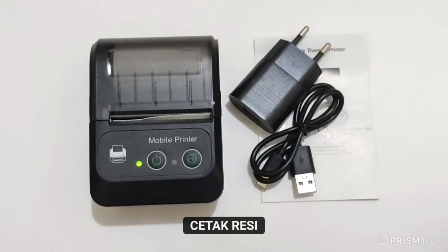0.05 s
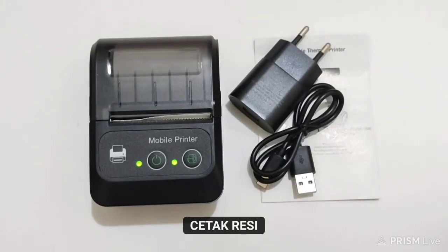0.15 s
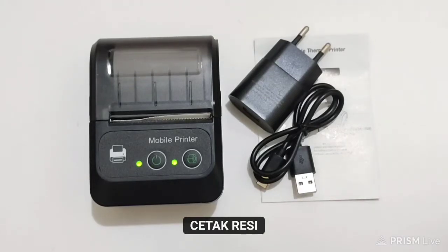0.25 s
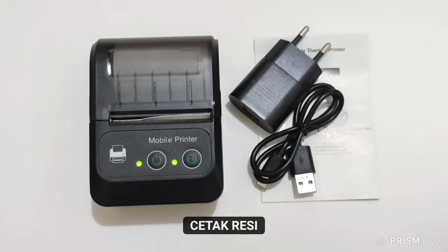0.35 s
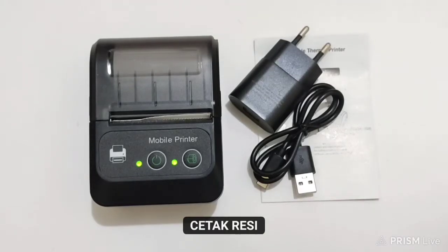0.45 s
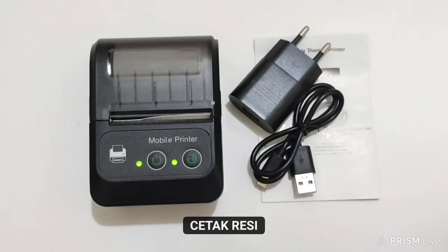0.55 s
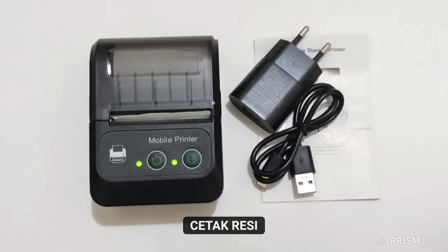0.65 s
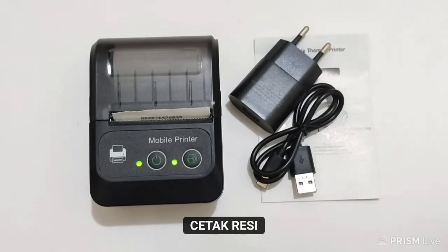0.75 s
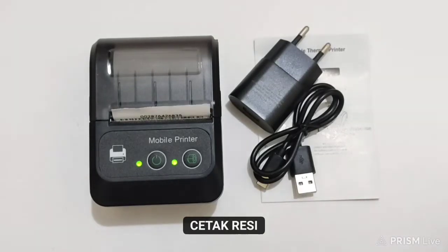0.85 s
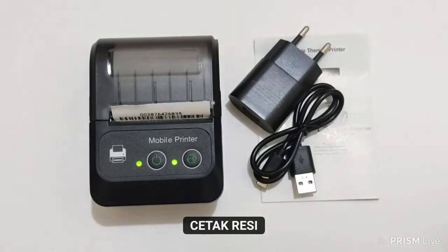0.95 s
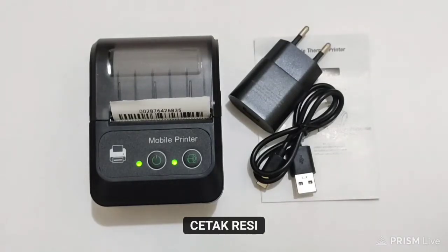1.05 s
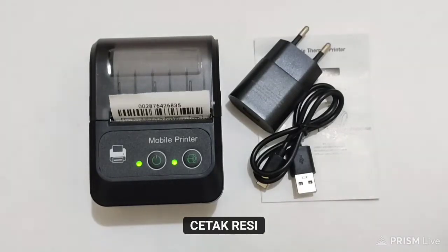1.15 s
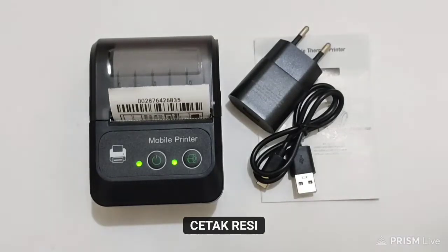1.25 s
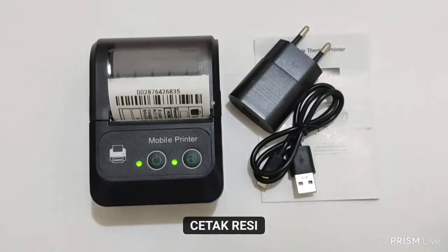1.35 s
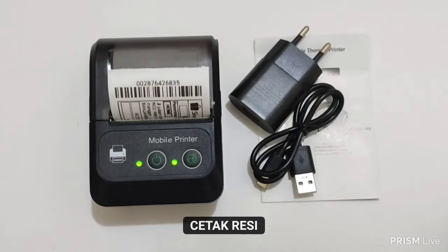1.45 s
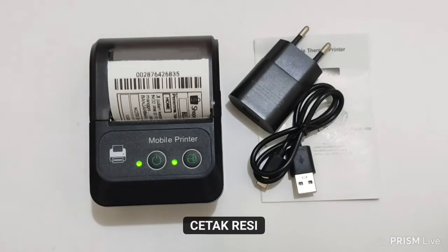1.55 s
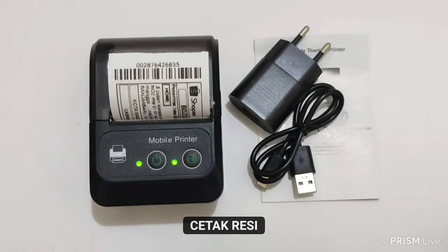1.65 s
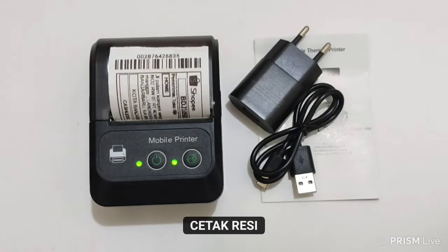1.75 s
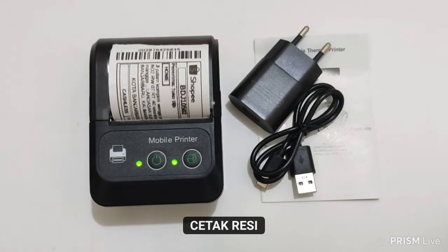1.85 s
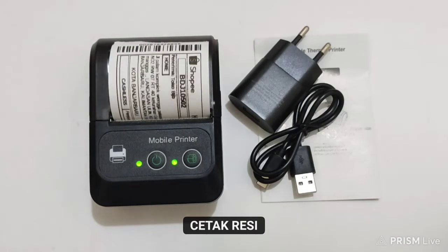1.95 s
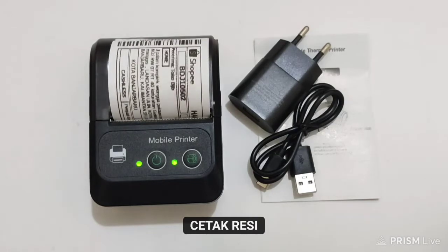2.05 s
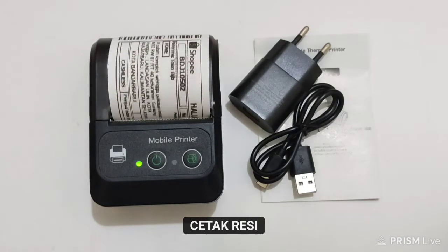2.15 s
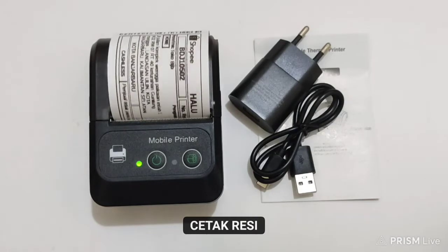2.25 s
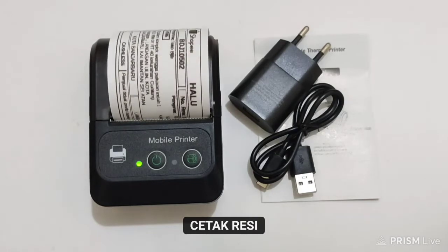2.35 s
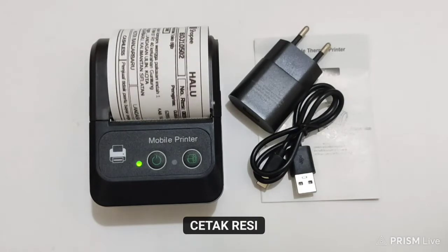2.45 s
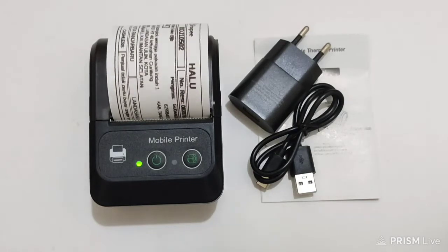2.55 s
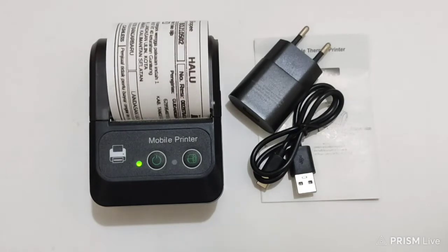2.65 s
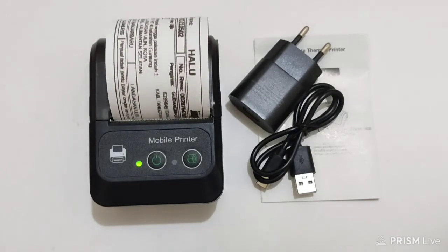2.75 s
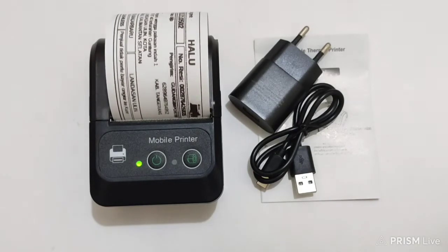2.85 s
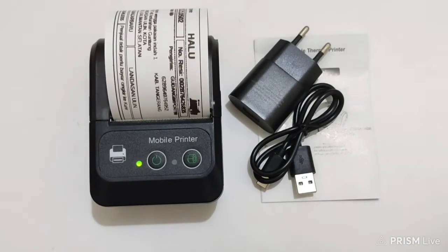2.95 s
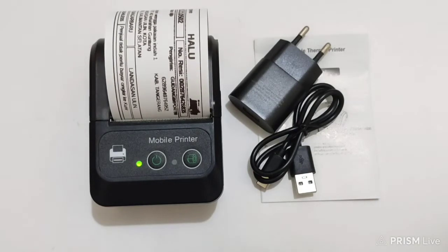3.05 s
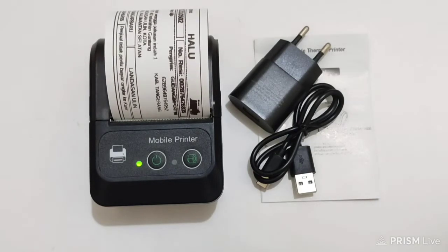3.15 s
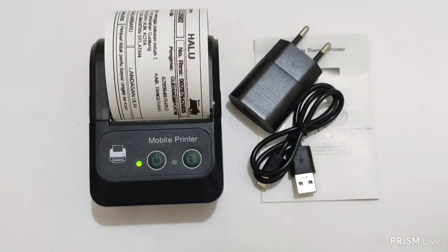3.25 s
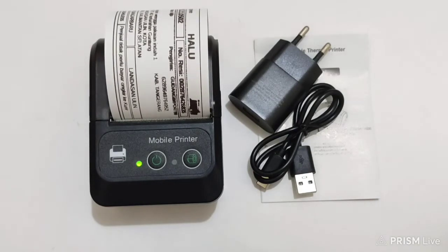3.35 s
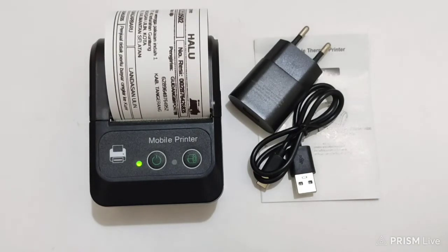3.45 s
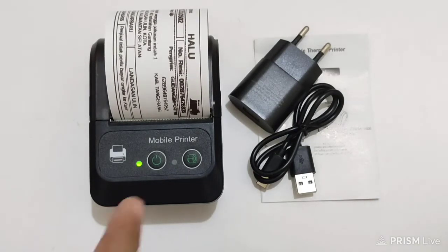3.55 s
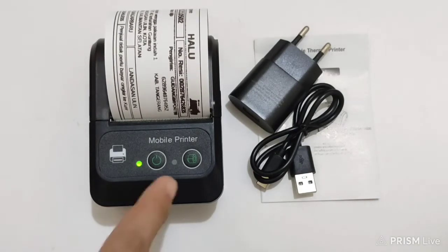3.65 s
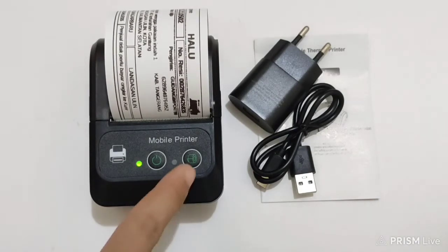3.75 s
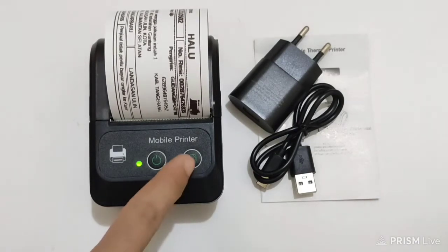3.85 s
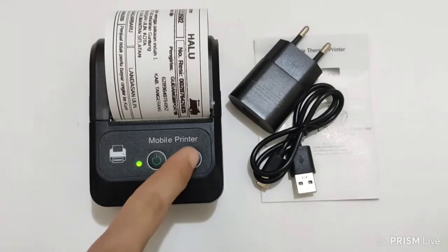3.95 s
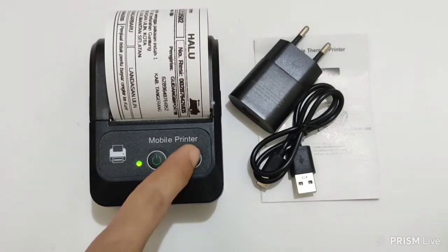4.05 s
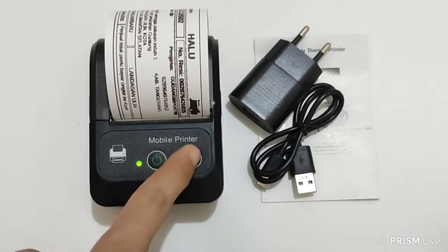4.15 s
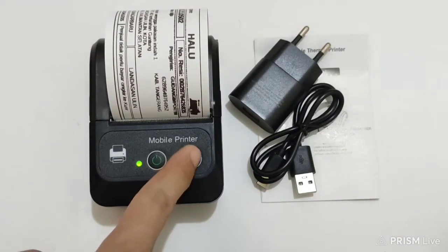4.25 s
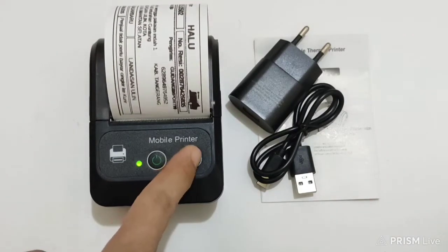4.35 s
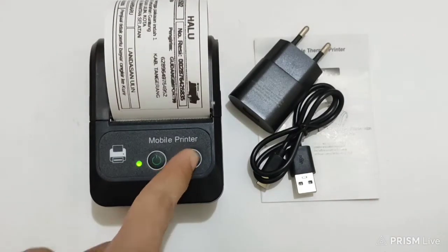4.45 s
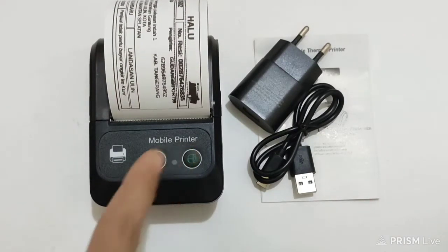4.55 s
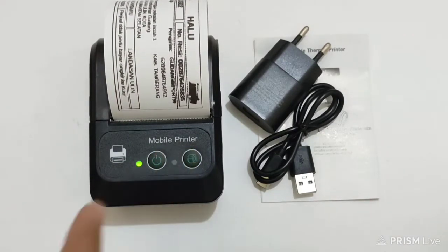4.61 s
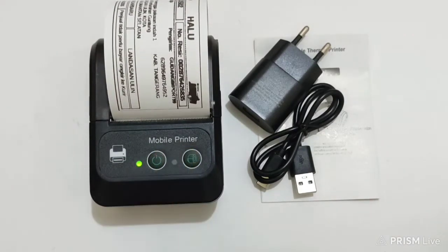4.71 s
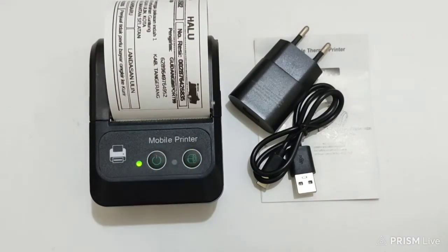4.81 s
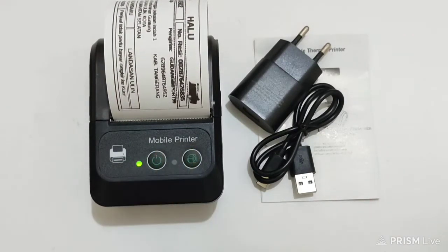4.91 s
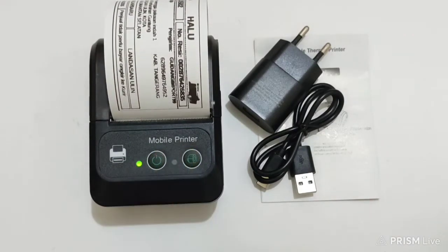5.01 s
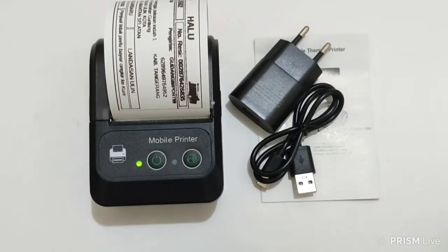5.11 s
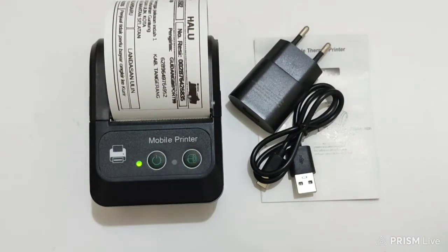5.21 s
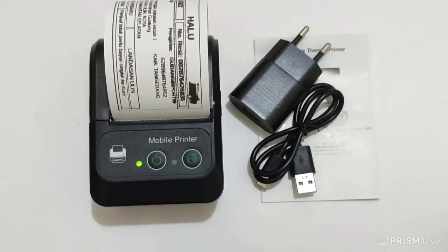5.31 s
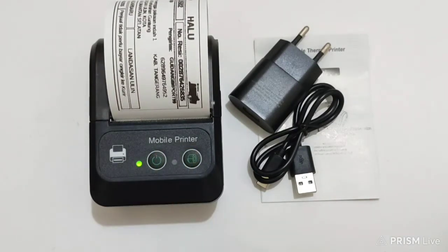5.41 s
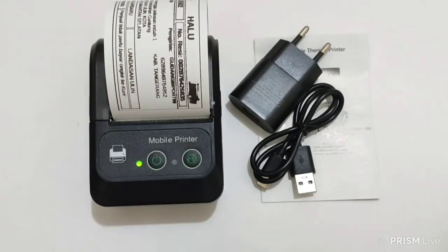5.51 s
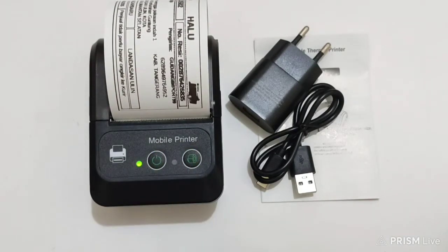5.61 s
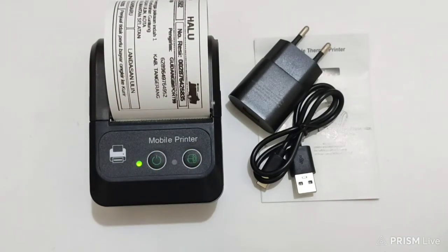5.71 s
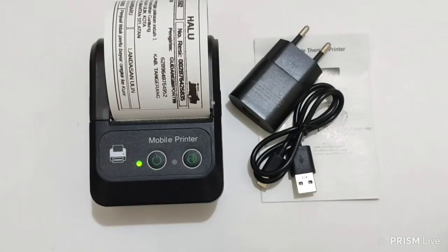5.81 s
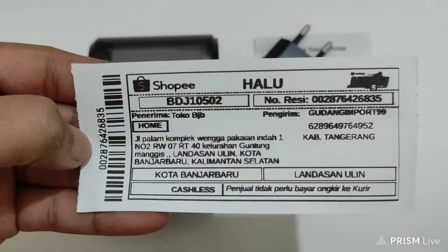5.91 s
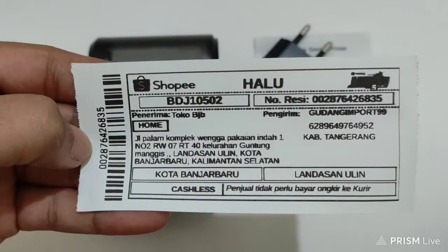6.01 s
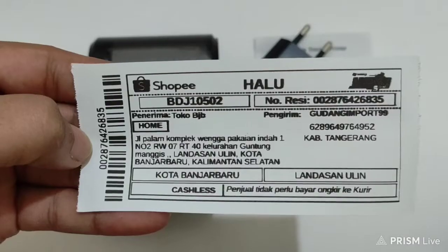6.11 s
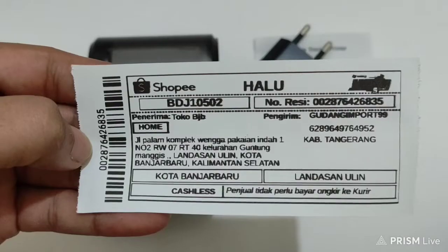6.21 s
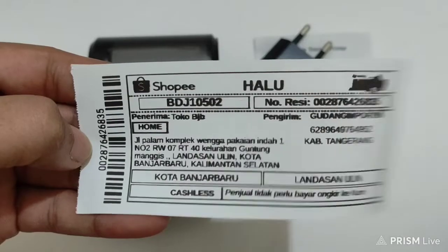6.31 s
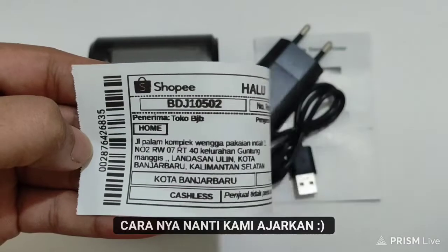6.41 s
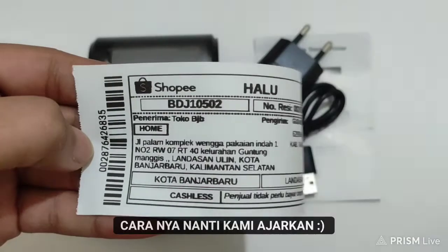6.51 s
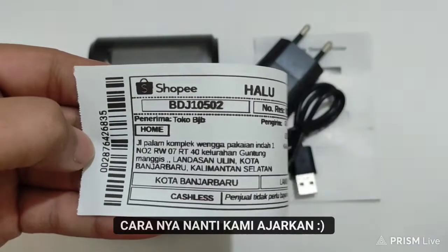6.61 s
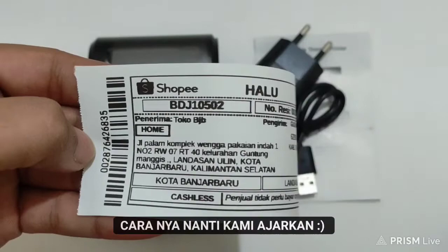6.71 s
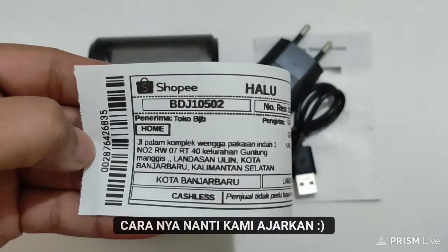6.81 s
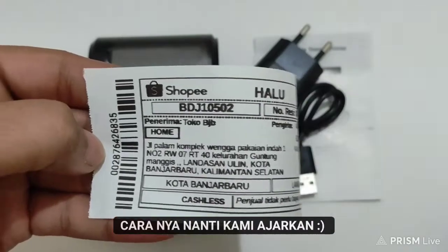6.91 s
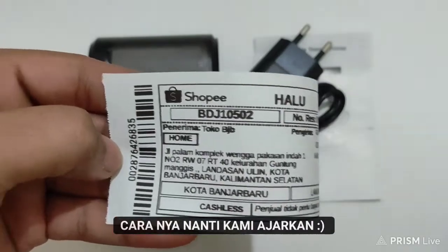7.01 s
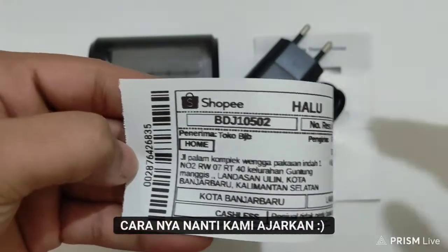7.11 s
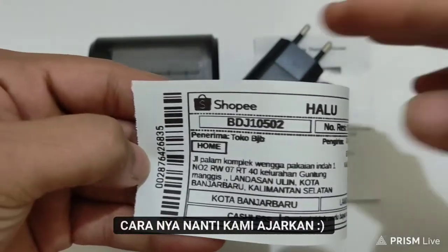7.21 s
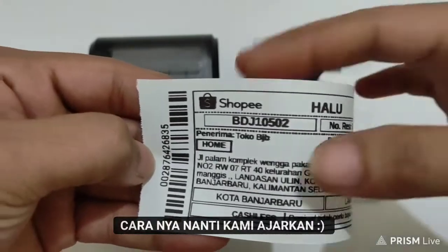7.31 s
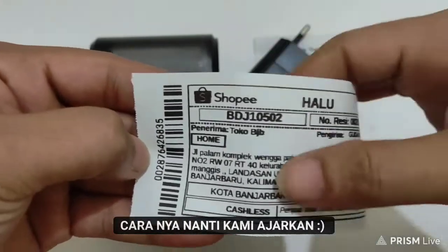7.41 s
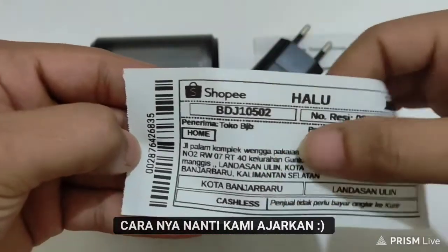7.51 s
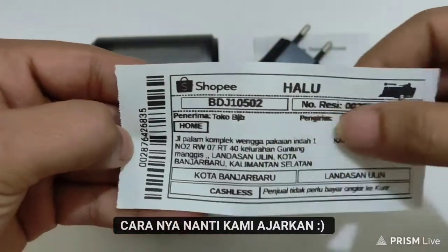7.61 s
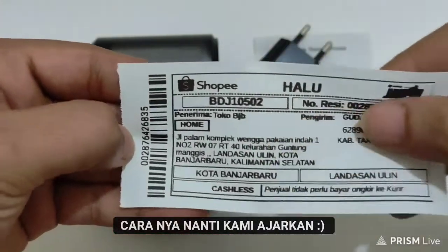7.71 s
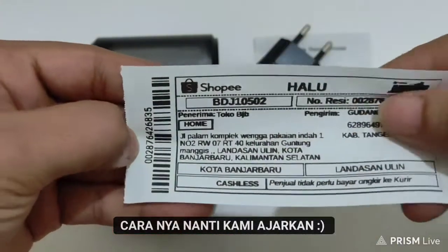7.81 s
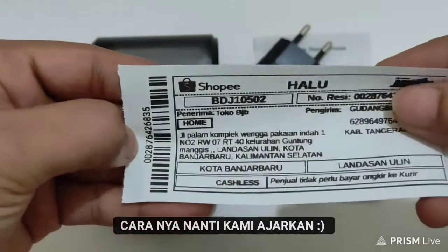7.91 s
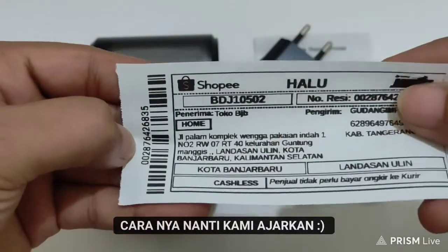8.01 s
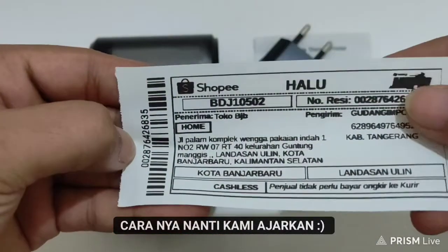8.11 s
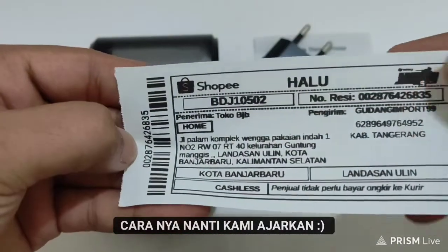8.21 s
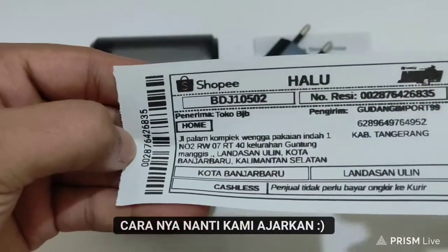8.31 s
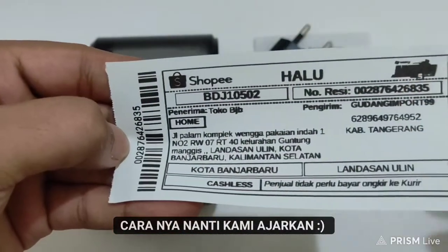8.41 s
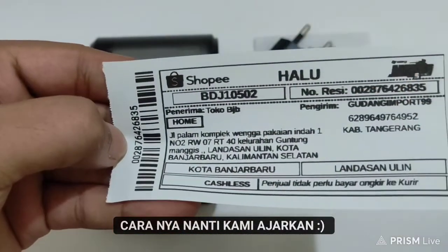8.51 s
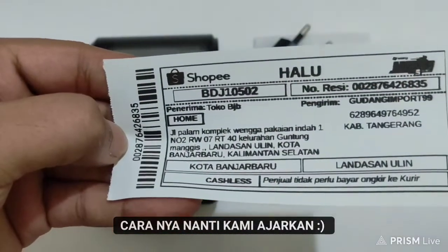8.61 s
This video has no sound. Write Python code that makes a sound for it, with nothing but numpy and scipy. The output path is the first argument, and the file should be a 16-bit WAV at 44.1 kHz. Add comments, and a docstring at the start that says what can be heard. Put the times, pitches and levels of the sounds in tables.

```python
"""A small thermal label printer on a table in a quiet room, close to a two-port phone microphone.
Its gears clack into mesh and the stepper motor feeds a label at changing rates: the steps buzz the case,
paper and gears hiss, the rotor whines. The feed button clicks and runs it once more. Later comes a
light tap, then fingers rub the label and it snaps taut. Behind it all the room answers and hums."""
import sys
import numpy as np
from scipy import signal
from scipy.fft import rfft, irfft, next_fast_len
from scipy.io import wavfile
from scipy.ndimage import uniform_filter1d

SR = 44100
rng = np.random.default_rng(int(sys.argv[2]) if len(sys.argv) > 2 else 0)


def store_pcm(level_fs):
    """Save levels as 16-bit WAV."""
    pcm = np.round(np.clip(level_fs, -1, 1) * 32767).astype(np.int16)
    wavfile.write(sys.argv[1], SR, np.atleast_2d(pcm).T)


N = 381856

# stepper schedule, each row held until the next, rate 0 = not driven: start_s, rate_hz, scatter_steps
STEP_SCHEDULE = [(0, 0, 0), (.76, 80, .007), (1.05, 201, .02), (1.165, 180, .03), (1.22, 167, .025),
                 (1.33, 243, .08), (1.6, 228, .07), (1.76, 242, .02), (2.04, 222, .05), (2.11, 244, .015),
                 (2.58, 177, .03), (2.7, 205, .05), (2.75, 243, .03), (2.98, 0, 0), (4.32, 200, .03),
                 (4.352, 250, .012), (4.475, 0, 0)]
# resonances of the printer: pitch_hz, width_hz, level_db
CASE_MODES = [(231, 110, -4.5), (337, 250, -1.5), (559, 58, 7.5), (785, 82, 3), (980, 370, -20),
              (1084, 230, 3), (1510, 55, -2), (1770, 51, -7)]  # plastic case
FRAME_MODES = [(1950, 72, 4), (2880, 100, 3), (3880, 29, 16), (4620, 110, 8.5), (5620, 320, -6.5)]  # gear frame
RASP_MODES = [(2540, 270, -1.4), (2800, 120, -0.62)]  # rasp of a long label
LID_MODES = [(590, 110, -12), (782, 150, 0), (1230, 69, 2.5), (1480, 110, -6.5), (2040, 600, -17)]  # lid and table under a knock
# hiss of paper and gears: pitch_hz, level_db
HISS_SPECTRUM = [(150, -42), (500, -4.5), (1500, -0.5), (2200, -4), (2680, -2), (2950, 1.5), (3270, -24),
                 (3600, 1), (4300, 2), (5200, -1), (5750, 3), (6100, -3), (6800, -4), (7400, -10.5),
                 (8800, -4.5), (9700, -8.5), (11000, -4.5), (13000, -12.5), (15500, -29)]
# slack gears rattle as the drive starts, jumps or stops: start_s, hiss_db, buzz_above_db, t60_s
RATTLES = [(0.646, -61.5, -10.5, 0.11), (.655, -56, 3, 0.05), (.665, -51, -18, 0.3), (.68, -57, 12.5, 0.23),
           (0.706, -56, -0.5, 0.27), (1.042, -51.5, 1, 0.15), (1.09, -69.5, 22.5, 0.29),
           (2.76, -68, -3, .6), (2.937, -62, 11.5, 0.26), (4.318, -60, 12, 0.12), (4.473, -49, 4, 0.1)]
# rotor tones: step_rate_multiple, level_db, left_lead_rad
WHINE_TONES = [(1, -7, 0.42), (2, -3, .2), (3, 2.5, 0), (4, -8, 0.64), (5, -6, 2.7), (7, -11, .3),
               (8, -9, 0), (10, -13, .3), (11, -6, 0)]
# gears and button knock on the case: start_s, level_db, crack_above_db, contact_s
KNOCKS = [(0.647, -47, 19, 0.00052), (0.66, -24, -11, 0.0022), (0.6785, -19.5, -3.5, 0.0018),
          (0.6932, -21, -14, 0.0023), (0.702, -19, 6, 0.00027), (0.708, -28, -13, 0.00053),
          (0.724, -39, 2, 0.0013), (0.739, -26.5, -11, 0.0014), (0.789, -39, -17, 0.0008),
          (2.937, -32, -22, 0.00071), (4.245, -26.5, -4, 0.0013), (4.256, -40, -12, .0006),
          (4.282, -40, -13, .0006), (4.315, -38, 0.5, 0.00046), (4.4731, -24, -14, 0.0011),
          (4.487, -29.5, -20, 0.00061)]
# gear squeak: start_s, hold_s, upper_band_db, lower_band_above_db
SQUEAKS = [(.648, 0.012, -44.5, -1.5)]
# its two bands: pitch_hz, width_hz, level_db
SQUEAK_BANDS = [(5750, 530, 0), (4170, 900, 0)]
# finger strokes on the label: start_s, hold_s, scrape_db, flutter_above_db
RUBS = [(6.295, 0.0079, -69, 8), (7.355, 0.048, -64, 2.5), (7.39, 0.01, -52.5, -5),
        (7.45, 0.13, -47.5, -10.5), (7.575, 0.018, -56.5, 8), (7.73, 0.12, -58.5, -11),
        (7.9, 0.11, -75, 6.5), (7.985, 0.029, -65, -9), (8.055, 0.012, -64, 1), (8.14, 0.012, -82, 18)]
# skin on paper, and the fluttering sheet: pitch_hz, level_db
SCRAPE_SPECTRUM = [(590, -41), (1000, -5.5), (1260, -10.5), (1710, 3), (1880, 1), (6560, 2), (7110, -3.5),
                   (11000, 5), (15500, -9)]
FLUTTER_SPECTRUM = [(35, -45.5), (60, -10), (200, -1.5), (340, -1), (504, -7), (782, -9), (2000, -19.5),
                    (2600, -47), (4400, -120)]
# the label buckles: start_s, level_db, crack_above_db, contact_s, left_over_right_db, tension_semitones
SNAPS = [(7.362, -41.5, -23, 0.0017, -0.5, -3), (7.409, -34.5, -16, 0.0022, 2, -6.5),
         (7.447, -30.5, -17, 0.0027, 2.5, -5), (7.452, -31.5, -21, 0.0023, 4, -2),
         (7.579, -39.5, 10, 0.00081, -3.5, -1.5), (7.584, -34.5, -4, 0.0012, 6.5, .3),
         (7.594, -36.5, -1.5, 0.0023, 1.5, -3), (7.608, -30.5, -20.5, 0.0021, 0, 0),
         (7.612, -31, -26, 0.0016, 2.5, 1), (7.7525, -31.5, -17.5, 0.0021, 5, -3.5),
         (7.758, -7, -5.5, 0.0012, 0.5, 1), (7.7635, -25.5, -15, 0.00046, 10, 4.3),
         (7.991, -48.5, -9, 0.00073, 4, -0.5), (8.075, -45.5, -19, 0.0015, 5, 2.5),
         (8.152, -46.5, -23, 0.0014, 7.5, 6)]
# a light tap that bounces: start_s, level_db, crack_above_db, contact_s
TAPS = [(6.3005, -38.5, -21, 0.00048), (6.31, -42.5, -17, .0005), (6.321, -47, -19, .001)]
# resonances of the label and of the tapped object: pitch_hz, width_hz, level_db
LABEL_MODES = [(143, 260, -16), (296, 180, -6), (780, 146, 8), (1760, 360, 7), (2934, 350, -3.5)]
HOLLOW_MODES = [(620, 70, 0.5), (800, 86, 3.5), (1390, 130, -5), (1630, 100, 1.5), (2330, 200, -6)]
# faint hiss after the first feed: start_s, hold_s, broad_db, treble_band_above_db
AFTERHISS = [(3.05, 0.29, -65.5, -9.5)]
# faint treble ticks: start_s, level_db
TICKS = [(3.603, -72), (3.634, -73), (3.659, -72), (3.695, -74), (3.754, -75)]
# decay of the room: pitch_hz, t60_s
WALL_DECAY = [(200, 0.65), (1000, 0.35), (5000, 0.41), (12000, 0.39)]
# room and microphone noise: pitch_hz, level_db
HUM_SPECTRUM = [(12, -49.5), (20, -65), (47, -13), (126, -2), (191, -6), (352, -8.5), (549, -14),
                (631, -14), (985, -19), (1720, -22.5), (1920, -27.5), (3260, -27), (7520, -35),
                (8880, -34.5), (15500, -33)]
# balance at the microphone: pitch_hz, left_over_right_db
PRINTER_PAN = [(60, 5), (180, 3.5), (550, 0), (1650, 0), (4970, 3.5), (15000, -5)]
LABEL_PAN = [(60, -0.5), (180, 2.5), (550, 0.5), (1650, 0), (4970, 3), (15000, -4)]
# how alike the two ports hear each noise: pitch_hz, correlation
HISS_ALIKE = [(500, 1), (1700, 0.12), (2600, 0.5), (3200, 1), (3600, 0.3), (4300, 0.25), (5200, 0.46),
              (6000, 0.91), (6800, 0.074), (15000, .05)]
SCRAPE_ALIKE = [(600, 0.83), (2400, 0.61), (3500, 0.52), (5500, .35), (7000, .1), (15000, .05)]
HUM_ALIKE = [(60, 0.37), (380, 0.17), (2380, 0.0), (15000, -0.166)]

FULL_RATE_HZ, SETTLE_S = 243, 0.01  # full feed speed; time the drive takes to reach a new speed
LEFT_LEAD_S = 7 / SR  # the printer stands nearer the left port
SIDES = np.array([[.5], [-.5]])  # splits a difference between left and right
TIME_S = np.arange(N) / SR


def printer():
    """Motor, squeak and knocks reach the microphone from one spot on the table."""
    return placed(motor() + gear_squeak() + case_knocks(), PRINTER_PAN, LEFT_LEAD_S)


def motor():
    """Each slightly uneven step gives a kick that drives the buzz and the hiss; the rotor sings along."""
    start_s, drive_hz, scatter = np.transpose(STEP_SCHEDULE)
    # undriven gears chatter fast and unevenly
    rate_hz, scatter = np.where(drive_hz > 0, [drive_hz, scatter], [[400], [.3]])
    row = np.searchsorted(start_s, TIME_S, side="right") - 1
    speed, rate_hz, scatter = drive_hz[row] / FULL_RATE_HZ, rate_hz[row], scatter[row]
    load = wander(2500)  # random drag, as from dark print lines
    phase = np.cumsum(rate_hz * (1 + .6 * scatter * load)) / SR  # in steps
    step = np.round(phase).astype(int)
    lateness, strength = rng.standard_normal((step[-1] + 1, 2))[step].T
    since_step_s = (phase - step - np.clip(scatter * lateness, -.3, .3)) / rate_hz
    kicks = amp(1.8 * strength) * np.exp(-(since_step_s / 5e-5) ** 2) / np.sqrt(rate_hz)
    kicks /= np.sqrt(uniform_filter1d(kicks ** 2, size=2000) + 1e-12)
    bursts = 1 + 0.03 * np.cos(2 * np.pi * phase) + 0.15 * strength
    hiss_gain, buzz_gain = drive_gains(speed)
    buzz = case_buzz(kicks, speed)
    hiss = feed_hiss(kicks, bursts)
    return buzz_gain * buzz + hiss_gain * hiss + rotor_whine(phase, speed)


def drive_gains(speed):
    """Hiss grows with speed, slower steps buzz harder, and gear rattles add to both."""
    settled = uniform_filter1d(speed, size=round(SETTLE_S * SR))
    driven = uniform_filter1d(1. * (speed > 0), size=round(SETTLE_S * SR / 2))
    lid_db = np.where(TIME_S > 1.57, 0, -5.5)  # the hiss steps up as the label clears the lid
    hiss = amp(-66.5) + amp(-56.5 + lid_db) * np.abs(settled) ** 2.55
    buzz = amp(-57.5 - 1.5 * np.log2(np.clip(settled, .25, 2)))
    jolts = [(start_s, 0, db, above_db) for start_s, db, above_db, _ in RATTLES]
    rattle = envelopes(jolts, attack_s=0.0041, fade_db_per_s=[60 / t60_s for *_, t60_s in RATTLES])
    return np.hypot(driven * np.array([hiss, buzz]), rattle)


def case_buzz(kicks, speed):
    """Kicks ring the plastic case and smooth out at speed; rubbing parts stir and damp it."""
    kicked = unit(filtered(kicks, body(CASE_MODES)))
    damped_modes = [(hz, 2.8 * width, db) for hz, width, db in CASE_MODES]
    rubbed = unit(filtered(noise(), body(damped_modes)))
    smoothing = .75 * np.clip(speed, 0, 1) ** 3
    return unit((1 - smoothing) * kicked + .5 * rubbed)


def feed_hiss(kicks, bursts):
    """Paper and gears hiss in bursts tied to the steps, and the gear frame rings."""
    hiss = paired(bursts * noise() + 0.32 * kicks, bursts * noise(2), HISS_SPECTRUM, HISS_ALIKE)
    frame = unit(filtered(bursts * noise() + 1.86 * kicks, body(FRAME_MODES)))
    rasp = banded(bursts * noise() + 1.7 * kicks, RASP_MODES)
    rasp_db = np.where(TIME_S > 1.97, 1, -22)  # cuts in once the label is long
    return patchy(amp(2.5) * hiss + amp(-6) * (frame + amp(rasp_db) * rasp), depth_db=2.15)


def rotor_whine(phase, speed, flicker_db=2.5, waver_hz=7):
    """Multiples of the step rate sing as wavering tones, louder at speed."""
    def drift():
        knots = rng.standard_normal(N // 900 + 2)
        return np.interp(np.arange(N) / 900, np.arange(len(knots)), knots)

    tones = np.zeros((2, N))
    for multiple, db, lead_rad in WHINE_TONES:
        gain = amp(db + flicker_db * drift())
        cycles = multiple * phase + np.cumsum(waver_hz * drift()) / SR
        tones += gain * np.sin(2 * np.pi * cycles + lead_rad * SIDES)
    settled = np.abs(uniform_filter1d(speed, size=round(SETTLE_S * SR)))
    return amp(-60) * settled ** 2.5 * tones


def case_knocks():
    """Gears and button strike the case; each knock rebounds once, softer and duller."""
    rebounds = [(s + 0.0071, db - 9.5, crack_db - 2.5, contact_s) for s, db, crack_db, contact_s in KNOCKS]
    return blows(KNOCKS + rebounds, LID_MODES, rise_s=0.001947, crack_s=0.02, top_hz=14700,
                 push_db=28, crack_db=-11)[0]


def gear_squeak():
    """The gears take up with two narrow bands of friction noise."""
    gains = envelopes(SQUEAKS, attack_s=0.00071, fade_db_per_s=2993)
    return sum(gain * banded(noise(), [band]) for gain, band in zip(gains, SQUEAK_BANDS))


def label():
    """Skin slips over paper in dense grains; the sheet flutters and snaps. Gives direct and wall feeds."""
    scrape_gain, flutter_gain = envelopes(RUBS, attack_s=0.0095, fade_db_per_s=211.5)
    grains = amp(1.8 * wander(120))
    scrape = paired(grains * noise(), grains * noise(2), SCRAPE_SPECTRUM, SCRAPE_ALIKE)
    flutter = coloured(noise() + 0.11 * noise(2), FLUTTER_SPECTRUM)
    flaps = amp(2 * wander(500))
    snaps = blows(SNAPS, LABEL_MODES, rise_s=0.0025, crack_s=0.02, top_hz=11640, push_db=24.5, crack_db=-3)
    rubbing = scrape_gain * patchy(scrape, depth_db=4.5) + flutter_gain * flaps * flutter
    return placed(rubbing + snaps, LABEL_PAN, lead_s=0)


def hollow_tap():
    """Something small and hollow is tapped near the printer."""
    taps = blows(TAPS, HOLLOW_MODES, rise_s=0.00197, crack_s=0.022, top_hz=9000, push_db=31, crack_db=-5)
    return placed(taps[0], PRINTER_PAN, LEFT_LEAD_S)


def afterhiss():
    """A thin hiss after the first feed, perhaps the label settling, then faint treble ticks."""
    broad_gain, band_gain = envelopes(AFTERHISS, attack_s=0.12, fade_db_per_s=75)
    broad = coloured(noise(2), [(1000, -4), (3000, -5), (7000, -8.5), (15500, -8.5)])
    band = banded(noise(2), [(8600, 1100, 0)])
    tick_gain = np.zeros(N)
    for start_s, db in TICKS:
        tick_gain[round(start_s * SR):][:1000] = amp(db) * np.hanning(1000)
    return broad_gain * broad + band_gain * band + tick_gain * banded(noise(2), [(11200, 3000, 0)])


def room(x):
    """The walls answer 200 samples late, each frequency dying at its own speed."""
    hz, t, spectra = signal.stft(rng.standard_normal((2, SR // 2)), SR, nperseg=256)
    tail = signal.istft(spectra * amp(-60 * t / along(WALL_DECAY, hz)[:, None]), SR, nperseg=256)[1]
    delayed = np.pad(x, ((0, 0), (200, 0)))
    return signal.fftconvolve(delayed, tail / np.linalg.norm(tail[0]), axes=1)[:, :N]


def room_hum():
    """Steady room and microphone noise, partly shared by the ports in the bass."""
    def mid_and_side(hz):
        angle = np.arccos(np.clip(along(HUM_ALIKE, hz), -1, 1)) / 2
        return amp(along(HUM_SPECTRUM, hz)) * [np.cos(angle), np.sin(angle)]

    mid, side = filtered(noise(2), mid_and_side)
    return amp(-62.5 + 1.8 * SIDES) * unit(np.array([mid + side, mid - side]))


def blows(rows, modes, rise_s, crack_s, top_hz, push_db, crack_db):
    """Each blow rings a body, duller for longer contact, and cracks. Gives direct and wall feeds."""
    crack, click = np.zeros((2, 2, N + SR))
    ring = np.zeros((2, 2, N + SR))
    t = np.arange(SR // 20) / SR
    grid_hz = np.fft.rfftfreq(len(t), 1 / SR)
    onset = (t / rise_s) ** 8
    burst = onset / (1 + onset) * amp(-60 * (np.maximum(t - rise_s, 0) / crack_s) ** 1.046)
    # the walls get all directions averaged: broader modes, and a plain click for the crack
    broad_modes = [(hz, 5 * width, db) for hz, width, db in modes]
    for start_s, db, above_db, contact_s, *pan_and_tension in rows:
        pan_db, semitones = pan_and_tension or (0, 0)
        start, balance = round(start_s * SR), amp(SIDES * pan_db)
        span = slice(start, start + len(t))
        hz = grid_hz / 2 ** (semitones / 12)  # tension raises the modes
        force = np.exp(-((t - rise_s) / (0.17 * contact_s)) ** 2)
        responses = np.array([body(modes)(hz), 0.41 * body(broad_modes)(hz)])
        answer = irfft(rfft(force / force.sum()) * responses, len(t))
        ring[..., span] -= balance * amp(db + push_db) * answer[:, None]
        shared, left, right = rng.standard_normal((3, len(t)))
        crack_gain = amp(db + above_db + crack_db)
        crack[:, span] += balance * crack_gain * burst * (shared + 1.28 * np.array([left, right]))
        click[:, start + round(rise_s * SR)] += crack_gain * np.linalg.norm(burst)
    bright = lambda hz: body([(5000, 14000, 0)])(hz) ** 2 / (1 + (hz / top_hz) ** 8)
    return ring[..., :N] + filtered(np.array([crack, click])[..., :N], bright)


def placed(x, pan, lead_s):
    """Level and arrival time differ between the ports."""
    return filtered(x, lambda hz: amp(SIDES * along(pan, hz)) * np.exp(2j * np.pi * hz * lead_s * SIDES))


def paired(shared, own, spectrum, alike):
    """Coloured noise, partly common to the ports and partly each port's own."""
    def response(hz):
        common = np.clip(along(alike, hz), 0, 1)
        return amp(along(spectrum, hz)) * np.sqrt([common, 1 - common, 1 - common])

    parts = filtered(np.vstack([shared, own]), response)
    return unit(parts[0] + parts[1:])


def patchy(x, depth_db):
    """Random louder and softer patches in time and pitch."""
    spectra = signal.stft(x, nperseg=512)[2]
    patches = uniform_filter1d(rng.standard_normal(spectra.shape[-2:]), size=6, axis=0)
    patches = uniform_filter1d(patches, size=10, axis=1)
    return signal.istft(spectra * amp(depth_db * unit(patches)), nperseg=512)[1][..., :N]


def envelopes(rows, attack_s, fade_db_per_s):
    """Attack, hold and fade of each row, for a layer and its companion; powers add."""
    power = np.zeros((2, N))
    for (start_s, hold_s, db, above_db), fade in zip(rows, np.broadcast_to(fade_db_per_s, len(rows))):
        age_s = TIME_S - start_s
        shape = np.clip(age_s / attack_s, 0, 1) * amp(-fade * np.maximum(age_s - hold_s, 0))
        power += (amp([[db], [db + above_db]]) * shape) ** 2
    return np.sqrt(power)


def body(modes):
    """Causal response of a set of resonances, alternating in sign."""
    return lambda hz: sum((-1) ** k * amp(db) * 1j * hz * width / (pitch ** 2 - hz ** 2 + 1j * hz * width)
                          for k, (pitch, width, db) in enumerate(modes))


def filtered(x, response):
    """x through a complex response of frequency."""
    size = next_fast_len(N + SR // 2)
    return irfft(rfft(x, size) * response(np.fft.rfftfreq(size, 1 / SR)), size)[..., :N]


def banded(x, modes):
    """x twice through the resonances, at unit RMS."""
    return unit(filtered(x, lambda hz: body(modes)(hz) ** 2))


def coloured(x, spectrum):
    return unit(filtered(x, lambda hz: amp(along(spectrum, hz))))


def along(points, hz):
    """Interpolates (pitch_hz, value) points on a log axis."""
    pitches, values = np.transpose(points)
    return np.interp(np.log(hz + 1), np.log(pitches + 1), values)


def wander(samples):
    return unit(uniform_filter1d(noise(), size=samples))


def noise(*channels):
    return rng.standard_normal((*channels, N))


def amp(db):
    return 10 ** (np.asarray(db) / 20)


def unit(x):
    return x / np.sqrt(np.mean(x ** 2) + 1e-20)


def scene():
    """Printer, tap and label close by, the room behind them."""
    machine, tap = printer(), hollow_tap()
    sheet, sheet_to_walls = label()
    reverb = room(amp(-3.5) * (machine + sheet_to_walls) + amp(-13) * tap)
    return machine + tap + sheet + reverb + afterhiss() + room_hum()


def record(dry, top_hz=15600):
    """The phone keeps nothing above its band limit."""
    return filtered(dry, lambda hz: hz < top_hz)


dry = scene()
out = record(dry)
store_pcm(out)
```